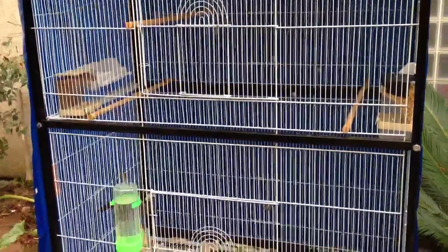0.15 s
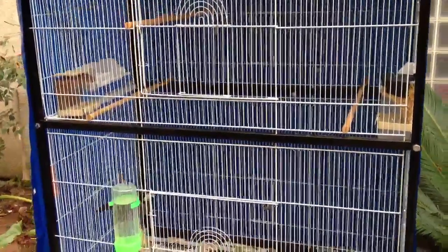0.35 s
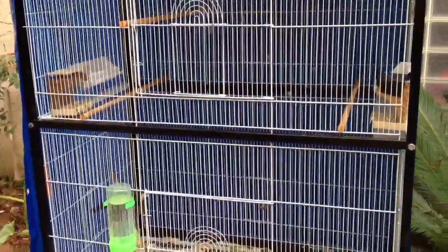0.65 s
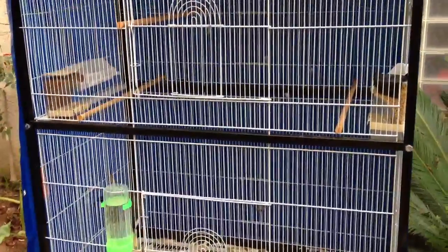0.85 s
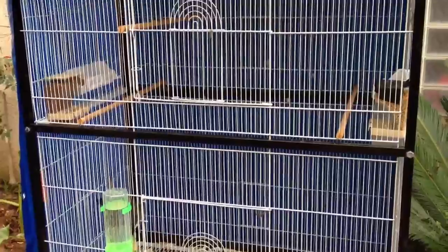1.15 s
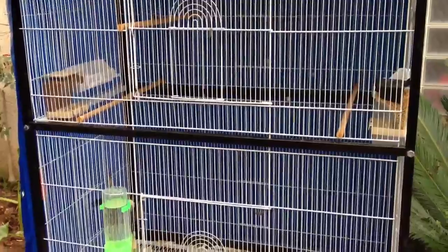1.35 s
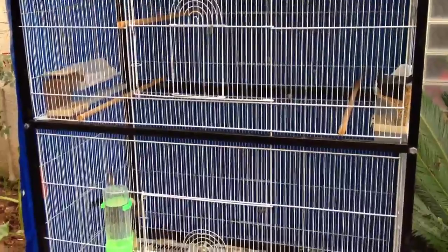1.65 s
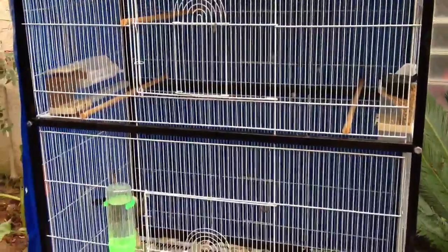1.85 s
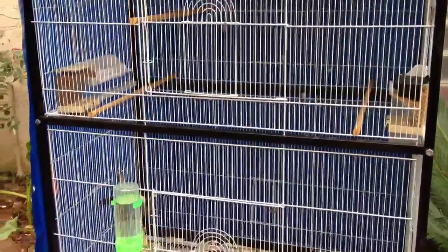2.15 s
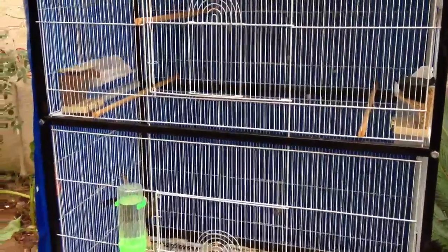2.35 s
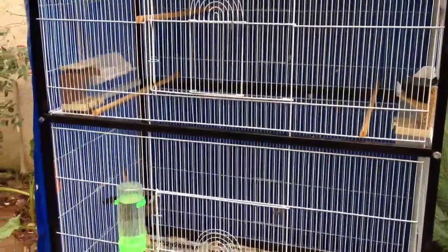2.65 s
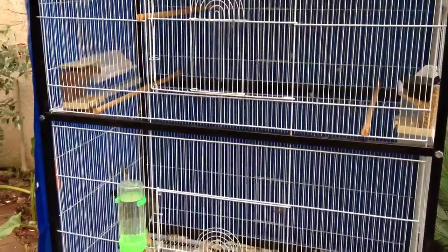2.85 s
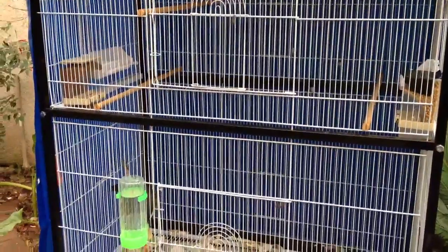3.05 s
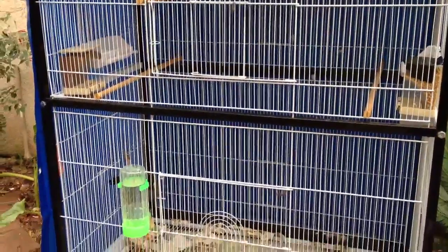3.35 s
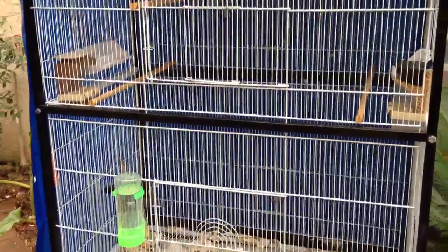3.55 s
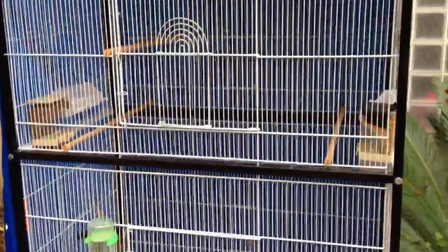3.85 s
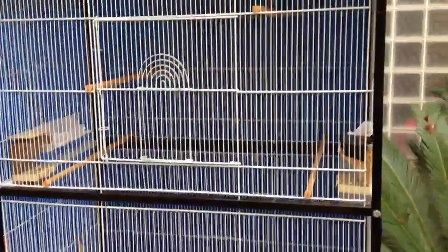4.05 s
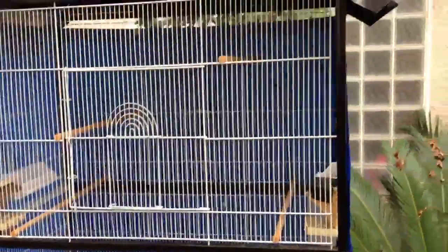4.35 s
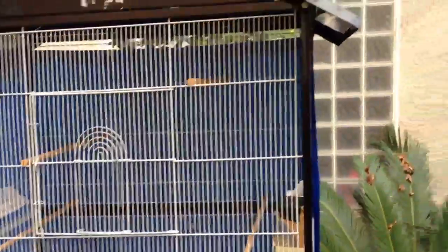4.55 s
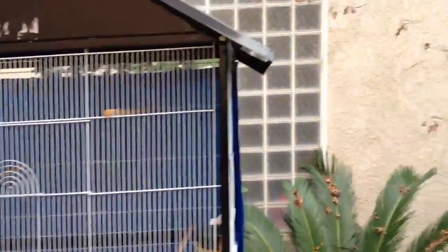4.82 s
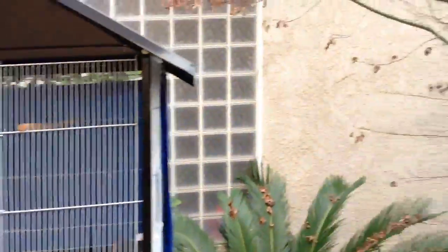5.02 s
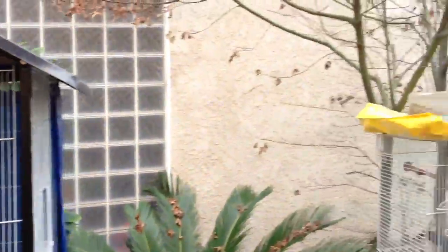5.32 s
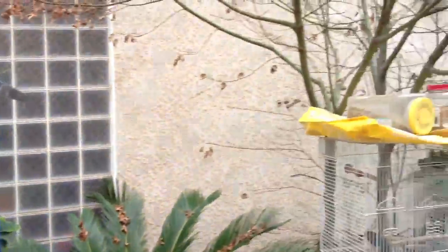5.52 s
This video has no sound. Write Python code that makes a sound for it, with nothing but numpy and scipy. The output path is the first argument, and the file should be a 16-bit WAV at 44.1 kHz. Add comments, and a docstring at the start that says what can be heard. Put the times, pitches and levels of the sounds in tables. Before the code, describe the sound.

Several caged birds in a walled backyard. A small bird sings thin high notes and a rapid falling trill over a husky warble, then another gives five harsh rasps. From the middle on, the nearest bird whistles loud clean slides, hooks and a quaver. Faint far whistles, light cage ticks and a quiet outdoor hush sit behind; echoes blur everything.

```python
"""The nearest of several caged songbirds in a walled backyard whistles loud sliding notes, hooks and a quaver.
Before it, a small bird sings thin high notes and a fast trill over a warbling neighbour; a third rasps five times.
Tones with weak overtones follow drawn pitch curves; in the rasps, noise shakes the tone into a harsh band.
A far whistler, cage ticks, a dull knock, an outdoor hush and a swelling hiss are behind, the last four from noise.
Echoes off the walls smear every note."""
import sys
import numpy as np
from scipy import signal
from scipy.fft import rfft, irfft
from scipy.io import wavfile
from scipy.ndimage import uniform_filter1d, minimum_filter1d

SR = 44100
rng = np.random.default_rng(int(sys.argv[2]) if len(sys.argv) > 2 else 0)


def generate_wav(signal):
    """Clip the signal to [-1, 1] and save it as 16-bit WAV at the path in sys.argv[1]."""
    frames = np.transpose(np.atleast_2d(signal))
    scaled = np.clip(frames, -1, 1) * 32767
    pcm = np.round(scaled).astype(np.int16)
    wavfile.write(sys.argv[1], SR, pcm)


N = 250488
TIME = np.arange(N) / SR
CUTOFF_HZ = 15400  # nothing much is heard above this

# Note and call levels are set ahead of each bird's overtones and yard mix; spectra give colour, not loudness.

# outdoor hush, its colour: (frequency [Hz], relative density [dB per Hz])
HUSH_COLOUR = [(35, -36.5), (52, -26.5), (70, -8), (90, -12), (125, -3), (180, 2.5), (260, 0.5),
               (450, -5.5), (900, -7.5), (1600, -8), (3500, -22), (6000, -29)]
# outdoor hush, its loudness before a final trim: (time [s], level [dB])
HUSH_LEVEL = [(0.0, -58.5), (2.04, -60.5), (4.45, -56), (4.73, -55), (5.55, -57)]
# high hiss, its colour: (frequency [Hz], relative density [dB per Hz])
HISS_COLOUR = [(400, -31), (2500, 2), (4300, 6), (5200, -12), (6500, -0.5), (9000, 0.5), (12000, 0.5),
               (14000, -2), (15500, -10.5)]
# swells of the hiss: (time of the top [s], half width [s], level [dB])
HISS_SWELLS = [(.2, .022, -56), (0.421, 0.14, -55.5), (3.589, 0.043, -54), (3.852, 0.054, -45),
               (3.951, 0.5, -52.5), (4.65, 0.2, -53), (5.178, 0.15, -48.5), (5.549, 0.95, -56.5)]

# first reflections off the nearest walls: (delay [s], level against the direct sound [dB])
WALL_ECHOES = [(.0047, -10), (.0098, -26), (.0156, -7.5), (.0225, -12.5)]
# overtone strength by where the overtone falls: (frequency [Hz], relative level [dB])
OVERTONE_COLOUR = [(3000, -31.5), (4500, -35), (5600, -39), (7200, -37.5), (8400, -31.5), (9600, -42.5),
                   (10800, -35), (12500, -63), (14500, -57.5)]

# small bird's thin arched notes:
# (time [s], length [s], start [Hz], middle [Hz], end [Hz], attack [s], level [dB])
THIN_NOTES = [ (0, 0.025, 4200, 4340, 4550, 0.0017, -39.5), (0, 0.04, 3650, 3660, 3650, 0.0037, -47.5),
              (0.081, .093, 6840, 7200, 6360, 0.084, -42.5), (0.272, 0.088, 6580, 7130, 6250, 0.082, -38),
              (0.475, 0.04, 5920, 5470, 5130, 0.016, -34.5), (1.221, 0.0344, 4345, 3940, 3830, 0.022, -25),
              (1.253, 0.18, 3780, 3710, 3640, 0.052, -28.5)]
# small bird's trill of down-slurs, all from one pitch: (time [s], length [s], end [Hz], level [dB])
TRILL_SLURS = [(0.522, 0.023, 4110, -22), (0.572, 0.025, 3810, -21), (0.62, 0.019, 3953, -22.5),
               (0.665, 0.025, 3478, -26), (0.798, 0.023, 3790, -28.5), (0.848, 0.017, 3710, -24),
               (0.895, 0.025, 3634, -24.5), (0.956, .03, 3190, -32), (1.006, 0.027, 3410, -28.5),
               (1.05, 0.024, 3584, -27.5), (1.177, 0.032, 3686, -27)]
# neighbour's warble: (time [s], length [s], start [Hz], middle [Hz], end [Hz], attack [s], level [dB])
WARBLE_NOTES = [ (0, 0.017, 2440, 2400, 2260, 0.003, -45.5), (0.058, 0.055, 2390, 2410, 2323, 0.044, -38),
                (0.145, 0.053, 3264, 3067, 2830, 0.037, -35.5),
                (0.312, 0.087, 1720, 2590, 1860, 0.055, -39), (0.429, 0.091, 1870, 2258, 2640, 0.05, -41.5),
                (.664, .17, 1870, 1876, 1470, .045, -48), (0.834, .135, 2937, 2394, 2090, 0.041, -39.5),
                (1.103, 0.075, 2387, 2588, 2664, 0.038, -37.5),
                (1.227, 0.028, 2080, 2230, 2200, 0.024, -42.5)]
# far whistler: (time [s], length [s], start [Hz], middle [Hz], end [Hz], attack [s], level [dB])
FAR_NOTES = [ (0, 0.057, 1553, 1495, 1360, .01, -47), (0.066, 0.27, 1388, 1314, 1524, 0.26, -49.5),
             (0.337, 0.31, 1512, 1585, 1595, 0.061, -51.5), (0.809, 0.35, 1492, 1307, 1542, 0.25, -49),
             (1.14, 0.24, 1530, 1655, 1610, 0.055, -50), (1.501, 0.24, 1610, 1610, 1586, 0.22, -57),
             (1.89, 0.18, 1203, 1201, 1218, 0.13, -54.5), (2.21, 0.222, 1598, 1585, 1616, 0.22, -48.5),
             (2.675, 0.173, 1202, 1212, 1216, 0.099, -52)]

# cage ticks, before their shared trim and colour: (time [s], level [dB])
CAGE_TICKS = [(1.6034, -58), (1.6337, -60), (1.9544, -56), (2.3294, -64), (3.13, -61), (3.208, -64),
              (4.2138, -37), (4.3232, -38.5), (4.4872, -39.5), (4.5197, -39), (4.6466, -39.5), (4.7, -43.5)]
# dull colour of the knock: (frequency [Hz], relative density [dB per Hz])
KNOCK_COLOUR = [(50, -50.5), (250, -1.5), (550, 0.5), (1100, -2), (2400, -24)]

# harsh calls that scoop into a rising or falling glide:
# (time [s], length [s], glide from [Hz], glide to [Hz], scoop [Hz], scoop time [s], attack [s], level [dB])
RASP_CALLS = [(1.733, .165, 1881, 1961, -300, 0.043, 0.051, -37.5),
              (2.006, .15, 3132, 2203, -350, .014, 0.033, -31),
              (2.473, 0.17, 2283, 2367, -540, 0.039, 0.079, -31.5),
              (2.735, .165, 3180, 2328, -350, 0.0142, 0.041, -26.5),
              (3.215, 0.22, 2220, 2340, -440, .055, .15, -29)]
# air rushing through the open beak in a rasp: (frequency [Hz], relative density [dB per Hz])
RASP_AIR_COLOUR = [(1200, -15), (2000, 4.5), (3300, -1), (4400, -4.5), (5300, -18.5), (6800, -12),
                   (8800, -30), (10400, -9.5), (12300, -33), (14300, -9.5), (15500, -10.5)]

# nearest bird's whistles, each scooping onto a straight glide and leaving it with a flick:
# (time [s], length [s], glide from [Hz], glide to [Hz], scoop [Hz], scoop time [s], flick [Hz],
#  attack [s], level [dB])
NEAR_WHISTLES = [ (3.561, 0.14, 3587, 3740, -260, 0.028, 10, .135, -18.5),
                 (3.69, .06, 4220, 4296, -520, .036, 0, 0.028, -22.5),
                 (3.796, 0.19, 3373, 3670, -110, 0.044, -5, 0.14, -15.5),
                 (4.743, .06, 2338, 2295, -370, 0.0238, 0.5, 0.05, -20.5),
                 (4.836, .226, 3000, 2660, -330, .02, -260, .18, -20),
                 (5.126, 0.13, 2272, 2196, 1231, .047, -2, 0.07, -19.5),
                 (5.251, .064, 2293, 2230, -82, 0.017, -150, .035, -13.5),
                 (5.38, 0.085, 2420, 2730, -280, 0.024, -130, 0.034, -21),
                 (5.497, .2, 3010, 2703, -230, .035, -2, 0.18, -18)]
# its hooks, which hold a pitch and drop off it: (time [s], length [s], start [Hz], held [Hz], level [dB])
NEAR_HOOKS = [(4.021, 0.079, 3145, 3056, -21.5), (4.191, 0.076, 2667, 2860, -24.5),
              (4.365, .083, 2567, 2845, -23.5)]
# the soft falling chip after each hook: (time [s], start [Hz], level [dB])
NEAR_CHIPS = [(4.15, 2396, -37.5), (4.328, 2368, -35), (4.493, 2482, -30)]
# its single quavering note: (time [s], length [s], centre pitch [Hz], level [dB])
NEAR_QUAVER = (4.53, 0.19, 2170.5, -26.5)


def from_db(db):
    """Decibels to gain."""
    return 10 ** (np.asarray(db) / 20)


def at_hz(points, hz):
    """Read a spectrum on a log-frequency axis."""
    known_hz, db = np.transpose(points)
    return np.interp(np.log(np.maximum(hz, 1)), np.log(known_hz), db)


def wander(rate_hz, size, order=2):
    """Random motion up to a given rate, spread 1."""
    run_in = SR // 10
    lowpass = signal.butter(order, rate_hz, fs=SR, output="sos")
    motion = signal.sosfilt(lowpass, rng.standard_normal(size + run_in))
    return motion[run_in:] / motion.std()


def coloured_noise(spectrum):
    """Noise of a given spectrum, rms 1."""
    colour = from_db(at_hz(spectrum, np.fft.rfftfreq(N, 1 / SR)))
    noise = irfft(rfft(rng.standard_normal(N)) * colour, N)
    return noise / noise.std()


def delayed(x, delay_s):
    """The same sound a little later."""
    return np.interp(TIME - delay_s, TIME, x, left=0)


def yard(x, direct_db, echo_db, t60_s=0.46, build_s=0.0011):
    """Direct sound, wall echoes that beat against glides, and a dense tail; a farther bird is less direct."""
    t = TIME[:SR * 3 // 4]
    early = x + sum(from_db(db) * delayed(x, delay_s) for delay_s, db in WALL_ECHOES)
    # sparse strong reflections stand out early in the tail
    scatter = (rng.random(len(t)) < 350 / SR) * np.exp(-t / 0.019)
    decay = from_db(-60 * t / t60_s) * (1 - np.exp(-t / build_s))
    tail = rng.standard_normal(len(t)) * (1 + 12 * scatter) * decay
    late = signal.fftconvolve(x, tail / np.linalg.norm(tail))[:N]
    return from_db(direct_db) * early + from_db(echo_db) * late


def gesture(s, length_s, attack_s, db, rise_db, fall_db, edge_s=0.0046):
    """One note swells to its peak and sinks, with soft edges: (samples, age, loudness)."""
    release_s = 1 / 250
    at = np.arange(max(int(s * SR), 0), min(int((s + length_s) * SR) + SR // 250, N))
    age = TIME[at] - TIME[at[0]]
    edges = np.clip(np.minimum(age, length_s + release_s - age) / edge_s, 0, 1)
    rising = np.maximum(1 - age / attack_s, 0)
    falling = np.clip((age - attack_s) / max(length_s - attack_s, edge_s), 0, 1)
    swell = from_db(db - rise_db * rising ** 2 - fall_db * falling ** 2)
    return at, np.minimum(age, length_s), swell * np.sin(np.pi / 2 * edges) ** 2


def arch(s, length_s, start_hz, middle_hz, end_hz, attack_s, db, rise_db, fall_db):
    """A note whose pitch bends in one smooth bow: (samples, pitch, loudness)."""
    at, age, loudness = gesture(s, length_s, attack_s, db, rise_db, fall_db)
    along = age / length_s
    bow_hz = middle_hz - (start_hz + end_hz) / 2
    pitch = start_hz + (end_hz - start_hz) * along + bow_hz * (1 - (2 * along - 1) ** 2)
    return at, pitch, loudness


def slur(s, length_s, start_hz, end_hz, attack_s, db, bend, rise_db, fall_db):
    """A sliding note; a bend above 1 slides fast and then flattens out: (samples, pitch, loudness)."""
    at, age, loudness = gesture(s, length_s, attack_s, db, rise_db, fall_db)
    return at, end_hz + (start_hz - end_hz) * (1 - age / length_s) ** bend, loudness


def whistle(s, length_s, from_hz, to_hz, scoop_hz, scoop_s, flick_hz, attack_s, db, rise_db, fall_db):
    """A straight glide, entered with a scoop and left with a flick: (samples, pitch, loudness)."""
    at, age, loudness = gesture(s, length_s, attack_s, db, rise_db, fall_db)
    glide = from_hz + (to_hz - from_hz) * age / length_s
    scoop = scoop_hz * np.exp(-(age / scoop_s) ** 2)
    flick = flick_hz * np.exp((age - length_s) / 0.016)
    return at, glide + scoop + flick, loudness


def syrinx(pitch, overtone_db, relaxed_db=-8, strain_db=14, between_db=-12, sub_db=-47, rolloff_db=2):
    """A near-pure tone, main line at rms 1, with the weak overtones that the throat lets through."""
    phase = 2 * np.pi * np.cumsum(pitch) / SR
    # high notes are pressed harder: they turn brighter and gain faint lines halfway between the overtones
    strain = np.interp(pitch, [2300, 3600], [0, 1])
    halfway = strain ** 4
    tone = np.sin(phase) + from_db(sub_db) * halfway * np.sin(phase / 2)
    for k in np.arange(2, 5.5, 0.5):
        level_db = at_hz(OVERTONE_COLOUR, k * pitch) + overtone_db
        level_db = level_db + relaxed_db + strain_db * strain - rolloff_db * max(k - 3, 0)
        share = from_db(between_db) * halfway if k % 1 else 1
        audible = k * pitch < CUTOFF_HZ
        tone += share * from_db(level_db) * audible * np.sin(k * phase)
    return np.sqrt(2) * tone


def sing(notes, jitter, overtone_db):
    """Whistled notes whose pitch trembles; jitter is the tremble as a fraction of the pitch."""
    out = np.zeros(N)
    for at, pitch, loudness in notes:
        trembling = pitch * (1 + jitter * wander(150, len(at)))
        out[at] += loudness * syrinx(trembling, overtone_db)
    return out


def outdoors(hush_trim_db=1.0, hiss_floor_db=-72.5):
    """A low hush that drifts in level, and a thin hiss that rises from its floor in soft swells."""
    hush_s, hush_db = np.transpose(HUSH_LEVEL)
    hush_gain = from_db(np.interp(TIME, hush_s, hush_db) + hush_trim_db)
    hiss_power = from_db(hiss_floor_db) ** 2
    for s, width_s, db in HISS_SWELLS:
        hiss_power = hiss_power + from_db(db) ** 2 * np.exp(-2 * ((TIME - s) / width_s) ** 2)
    return hush_gain * coloured_noise(HUSH_COLOUR) + np.sqrt(hiss_power) * coloured_noise(HISS_COLOUR)


def small_bird(trill_top_hz=4774, trill_attack_s=0.012, slap_s=0.043, slap_db=-11):
    """Thin arches and a trill whose notes drop fast and flatten; a wall slaps the song back a moment later."""
    slurs = [slur(s, length_s, trill_top_hz, end_hz, trill_attack_s, db, bend=1.88, rise_db=11, fall_db=6)
             for s, length_s, end_hz, db in TRILL_SLURS]
    arches = [arch(*row, rise_db=15.5, fall_db=20.5) for row in THIN_NOTES]
    trill = sing(slurs, jitter=0.016, overtone_db=-22)
    song = trill + sing(arches, jitter=0.0036, overtone_db=-14.0)
    # the slap fills the gaps between the trill notes
    song = song + from_db(slap_db) * delayed(song, slap_s)
    return yard(song, direct_db=-7.0, echo_db=-5.5, t60_s=0.29)


def neighbour():
    """A husky warble, its arched pitch trembling, from a farther cage and heard mostly off the walls."""
    notes = [arch(*row, rise_db=13.5, fall_db=7.5) for row in WARBLE_NOTES]
    song = sing(notes, jitter=0.018, overtone_db=-6)
    return yard(song, direct_db=-7, echo_db=-0.84, t60_s=0.34)


def far_whistler():
    """Faint low arched whistles, almost all echo."""
    notes = [arch(*row, rise_db=2, fall_db=9) for row in FAR_NOTES]
    song = sing(notes, jitter=0.009, overtone_db=-3.0)
    return yard(song, direct_db=-18, echo_db=-5.0, t60_s=0.56)


def struck(s, db, t60_s):
    """The envelope of one knock or tick: an instant start and a decay of 60 dB in t60_s."""
    return from_db(db - 60 * np.abs(TIME - s) / t60_s) * (TIME >= s)


def cage_noises(tick_t60_s=0.014, tick_trim_db=-7, knock_s=4.665, knock_db=-51.5, knock_t60_s=0.17):
    """Short bright ticks and one soft dull knock: decaying bursts of coloured noise."""
    ticks = sum(struck(s, db + tick_trim_db, tick_t60_s) for s, db in CAGE_TICKS)
    ticks = ticks * coloured_noise([(1000, -17), (5000, -5.5), (12000, 21.5), (16000, -3)])
    knock = struck(knock_s, knock_db, knock_t60_s) * coloured_noise(KNOCK_COLOUR)
    return yard(ticks + knock, direct_db=7, echo_db=-16.0)


def rasping_bird(width_hz=290, scatter=0.04, air_db=-22, burst_db=-42.5, burst_s=0.038):
    """The syrinx vibrates chaotically: strength and pitch jump within milliseconds, spreading tone to a band."""
    throat_hz, throat_width_hz = 2287, 180
    voice, rush = np.zeros(N), np.zeros(N)
    for s, length_s, from_hz, to_hz, scoop_hz, scoop_s, attack_s, db in RASP_CALLS:
        at, pitch, loudness = whistle(s, length_s, from_hz, to_hz, scoop_hz, scoop_s, 0, attack_s, db,
                                      rise_db=16.5, fall_db=8)
        age = TIME[at] - TIME[at[0]]
        tone = syrinx(pitch * (1 + scatter * wander(278, len(at))), overtone_db=-5)
        voice[at] += loudness * wander(width_hz, len(at), order=4) * tone
        # each call opens with a scratchy burst, an octave above its pitch
        burst_level = from_db(burst_db + at_hz(RASP_AIR_COLOUR, 2 * pitch))
        burst = burst_level * np.exp(-age / burst_s) * np.minimum(age / 0.024, 1)
        octave = np.sin(4 * np.pi * np.cumsum(pitch) / SR)
        voice[at] += 2 * burst * wander(850, len(at), order=4) * octave
        # more air escapes as the call goes on
        rush[at] += from_db(air_db) * loudness * np.sqrt(2 * age / age[-1])
    # the throat rings at one pitch while the calls slide through it
    throat = signal.lfilter(*signal.iirpeak(throat_hz, throat_hz / throat_width_hz, fs=SR), voice)
    sound = voice + from_db(-2) * throat + rush * coloured_noise(RASP_AIR_COLOUR)
    return yard(sound, direct_db=-6.0, echo_db=-3.0, t60_s=0.39)


def near_bird(hook_scoop_s=0.022, hook_drop_hz=558, hook_attack_s=0.057, chip_s=0.024, chip_fall_hz=454):
    """Loud, clean sliding whistles from close by, with three hook-and-chip pairs and a quaver in the middle."""
    notes = [whistle(*row, rise_db=13, fall_db=10.5) for row in NEAR_WHISTLES]
    for s, length_s, start_hz, held_hz, db in NEAR_HOOKS:
        notes.append(whistle(s, length_s, held_hz, held_hz, start_hz - held_hz, hook_scoop_s,
                             -hook_drop_hz, hook_attack_s, db, rise_db=12, fall_db=10))
    for s, start_hz, db in NEAR_CHIPS:
        notes.append(slur(s, chip_s, start_hz, start_hz - chip_fall_hz, chip_s / 2, db,
                          bend=0.93, rise_db=1, fall_db=3.5))
    song = sing(notes, jitter=0.0018, overtone_db=-1)
    return yard(song + quaver(), direct_db=-4, echo_db=-3.5, t60_s=0.37)


def quaver(rate_hz=76, depth_hz=185, flutter_db=1.5):
    """A low note shaken by a very fast, uneven vibrato while its loudness flutters."""
    out = np.zeros(N)
    s, length_s, centre_hz, db = NEAR_QUAVER
    at, _, loudness = gesture(s, length_s, length_s / 2, db, rise_db=2.5, fall_db=4)
    uneven_rate = rate_hz * (1 + 0.16 * wander(40, len(at)))
    shake = np.sin(2 * np.pi * np.cumsum(uneven_rate) / SR)
    flutter = from_db(flutter_db * wander(70, len(at)))
    out[at] = loudness * flutter * syrinx(centre_hz + depth_hz * shake, overtone_db=-31.0)
    return out


def scene():
    """All the birds, the cages and the outdoor air, one channel."""
    birds = small_bird() + neighbour() + far_whistler() + rasping_bird() + near_bird()
    return (outdoors() + birds + cage_noises())[None]


def record(dry, ceiling_db=-11, limiter_s=0.012):
    """A limiter holds down the loudest peaks, its gain moving over limiter_s, and the top is cut steeply."""
    span = max(int(limiter_s * SR), 2)
    allowed = np.minimum(from_db(ceiling_db) / (np.abs(dry) + 1e-9), 1)
    gain = uniform_filter1d(minimum_filter1d(allowed, size=span), size=span)
    steep_cut = signal.ellip(12, 0.1, 90, CUTOFF_HZ, fs=SR, output="sos")
    return signal.sosfilt(steep_cut, dry * gain)


dry = scene()
out = record(dry)
generate_wav(out)
```